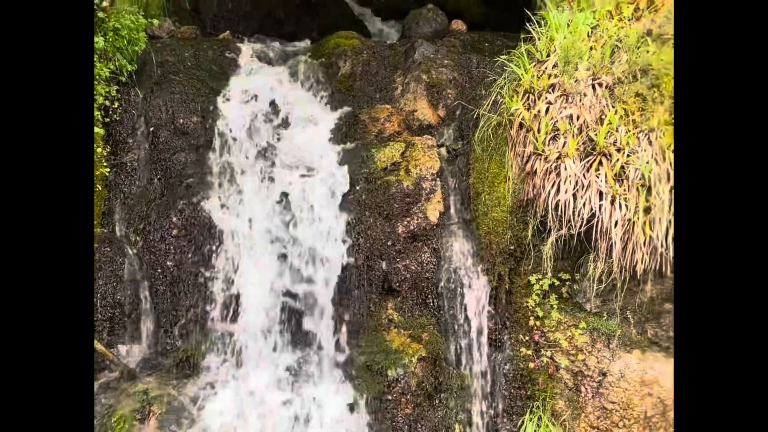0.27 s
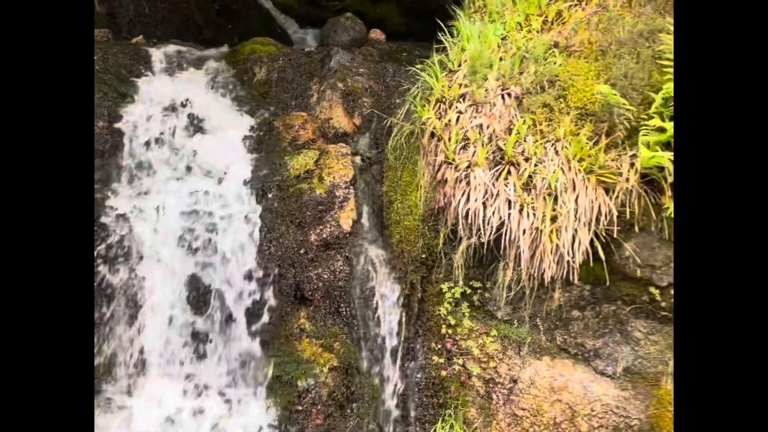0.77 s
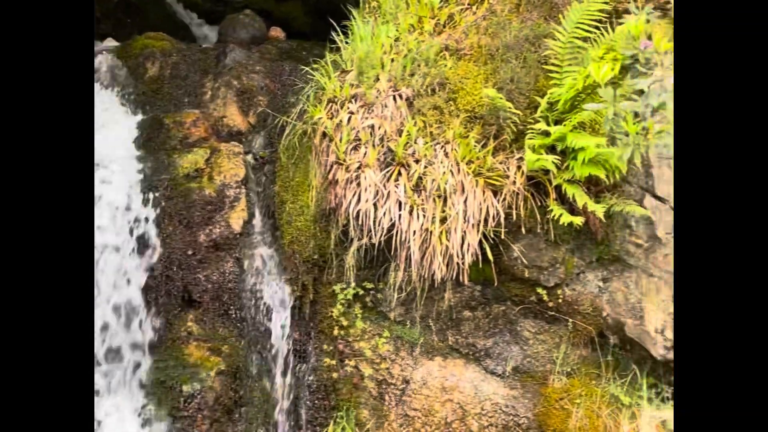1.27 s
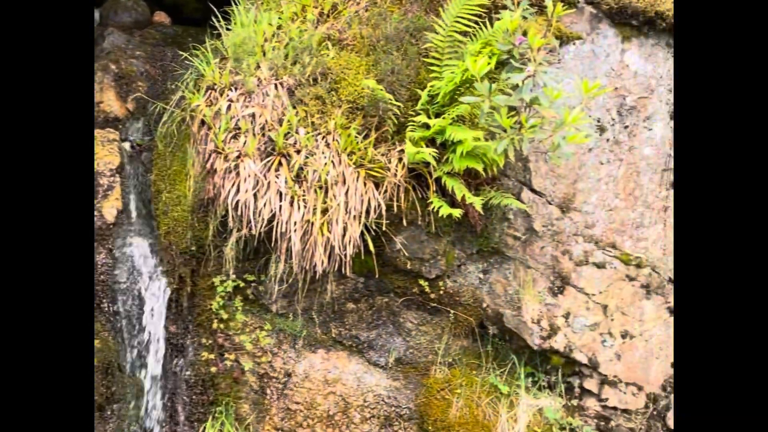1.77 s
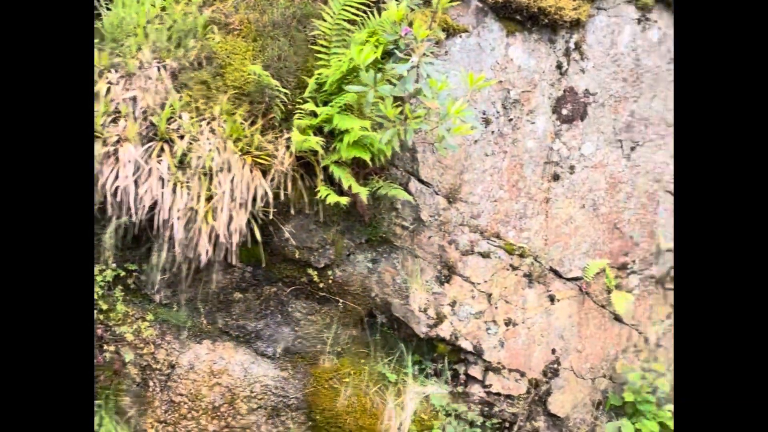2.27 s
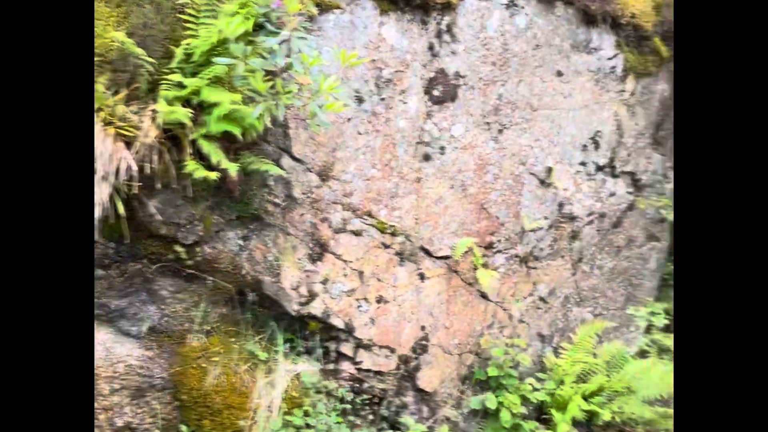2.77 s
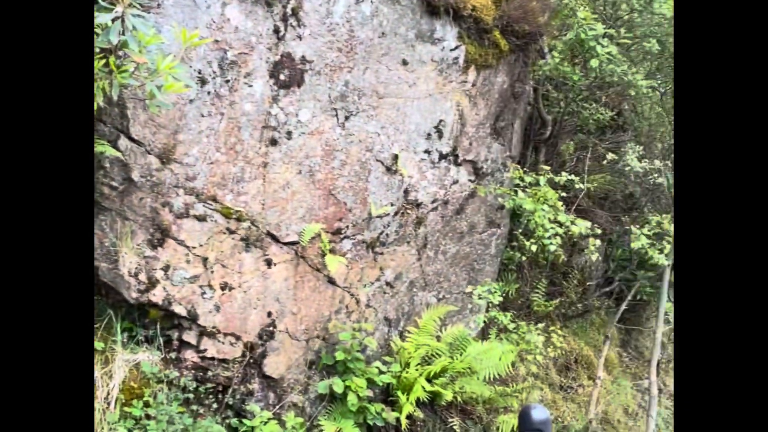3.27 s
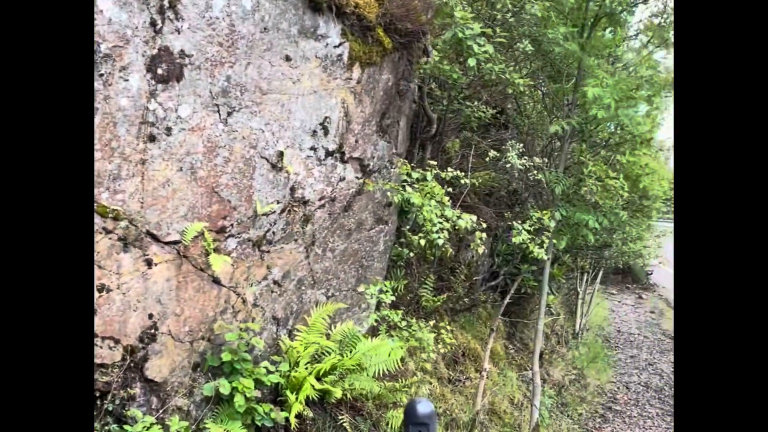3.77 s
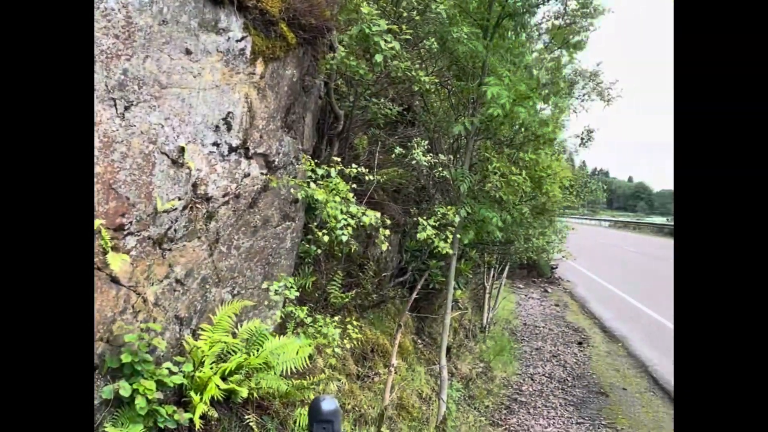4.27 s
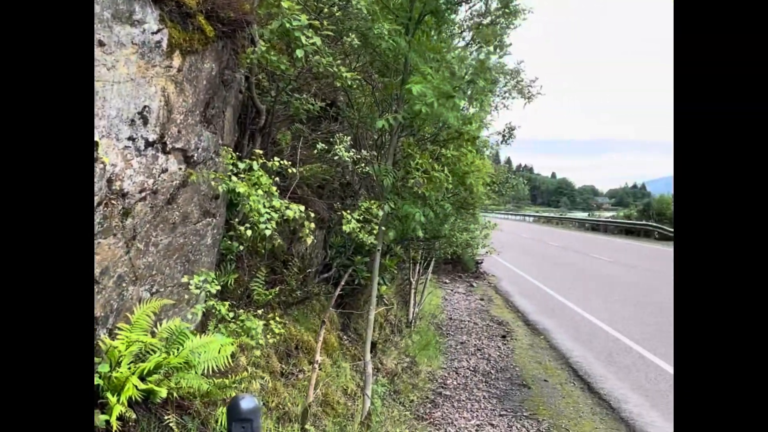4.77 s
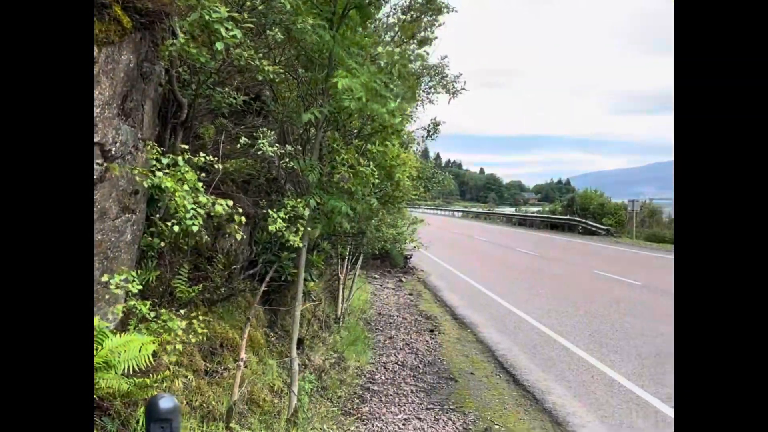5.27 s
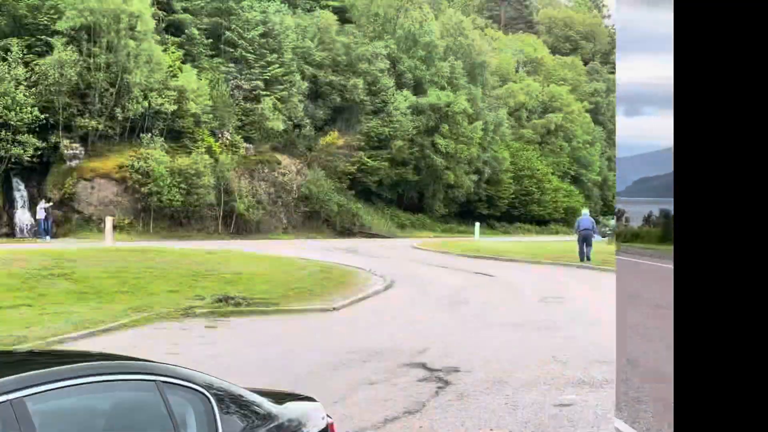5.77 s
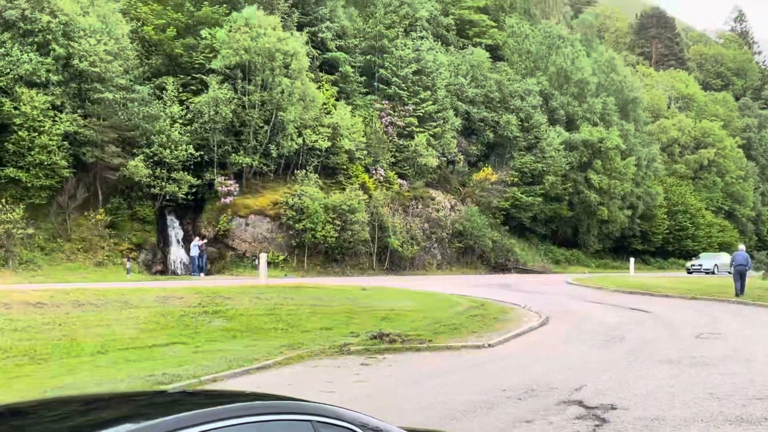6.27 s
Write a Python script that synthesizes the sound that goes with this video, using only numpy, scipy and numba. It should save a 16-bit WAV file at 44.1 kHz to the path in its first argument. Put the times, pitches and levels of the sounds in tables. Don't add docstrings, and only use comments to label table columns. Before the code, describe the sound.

From 0 to about 2 seconds a small waterfall beats on rock very close to a handheld phone: a dense, steady, broadband roar with crisp spray, gurgling body and brief bubble blips, surging slightly as heavier slugs of water land. Wind is barely present. Between 2 and 4 seconds the phone turns away, the water's tone shifts subtly, and low fluttering wind and dull thumps begin on the microphones, with a gust near 3.6. The water stays loud while gusts grow, peaking around 5 to 5.5 with heavy, deep thuds. From 5.4 to 5.9 the close roar crossfades into a distant, smoother, darker wash of water and road. A car's tyres roll past, their hiss brightest around 6.2 and then easing, with lighter wind rumble continuing until the end at roughly 6.5 seconds.

```python
import sys
import numpy as np
from scipy import signal
from scipy.fft import rfft, irfft, next_fast_len
from scipy.io import wavfile
from scipy.ndimage import uniform_filter1d
from numba import njit

SR = 44100
rng = np.random.default_rng(int(sys.argv[2]) if len(sys.argv) > 2 else 0)


def master(y):
    cut = np.clip(np.atleast_2d(y).T, -1, 1)
    pcm = np.round(cut * 32767)
    wavfile.write(sys.argv[1], SR, pcm.astype(np.int16))


def volts_from_db(level):
    exponent = np.asarray(level, float) / 20
    return 10 ** exponent


N = 287957
T = np.arange(N) / SR
HZ = np.fft.rfftfreq(next_fast_len(N), 1 / SR)


def waterfall():
    # (frequency [Hz], level per Hz [dB])
    facing_colour = [(90, -33), (130, -8.5), (250, -4), (500, -2), (900, -2.5), (1500, -4.5), (2600, -8.5),
                     (4300, -11), (5300, -9), (6000, -10.5), (7300, -13), (8300, -7.5), (12300, -9),
                     (15050, -16.5), (15300, -16)]
    turned_colour = [(90, 13), (130, 3), (250, -4.5), (500, -4), (900, -2.5), (1500, -6), (2600, -7.5),
                     (4300, -8), (5300, -8.5), (6000, -12), (7300, -12.5), (8300, -9), (12300, -11.5),
                     (15050, -17.3), (15300, -16)]
    # (frequency [Hz], left minus right [dB], likeness [0-1], left leads [rad])
    facing_pair = [(101, 4, 0.98, 0), (302, -2.5, 0.89, -0.75), (745, -2, 0.44, -0.6),
                   (1020, -2.5, 0.88, -2), (1680, -1.3, 0.38, -1.7), (2250, 0, 0.68, 0.95),
                   (2430, -0.5, 0.24, 1.5), (3280, 1.5, 0.27, 0.8), (3850, -0.5, 0.5, 0.14),
                   (5420, 4, 0.42, 1.1), (5450, -2, 0, 8), (5560, -1, 0.3, -3), (7020, 3, 1, 1.5)]
    turned_pair = [(100, 7, 0.53, -0.5), (302, -5, 0.68, -0.7), (670, -6, 0.57, -1.93),
                   (1260, -2.5, 0.37, -2), (1820, 2, 0.33, -1.4), (2090, -0.5, 0.14, 1.5),
                   (2520, 1, 0.7, 2), (3700, 0, 0.32, -0.2), (4920, 0, 0.92, 1.4), (5070, 4.5, 0.081, 2.5),
                   (5570, -2, 0.22, -4.5), (5900, 4.5, 0.18, -1.5), (6700, 7, 0.36, -2)]
    # (frequency [Hz], left minus right [dB], likeness facing [0-1], likeness turned [0-1], left leads [rad])
    treble_pair = [(7350, 0.8, 0.6, .72, -2), (7560, 2, 0.89, 0.79, -3), (8210, .2, 0.92, 0.92, -3),
                   (8320, .1, 1, 1, -3.14), (8940, 0, 1, 1, -3), (9030, 2.5, 0.94, 0.96, -3),
                   (9540, -2, 0.85, 0.89, -3), (9700, -0.5, 0.65, .65, -3.5), (11700, 0.1, 0.69, 0.72, -5),
                   (12340, -1, 0.84, 0.82, -6.9), (12480, 2, .885, .895, -6), (12950, 0.01, 0.92, .925, -6),
                   (13060, 0.5, 0.96, 1, -6)]
    # (time [s], turned away [0-1])
    phone_swing = [
        (0, 0.02),
        (1, 0.07),
        (2, 0.17),
        (3, 0.64),
        (4, 0.9),
        (5.4, 0.93),
    ]
    # (time [s], length [s], level [dB])
    slugs = [(0.15, 0.041, -8.5), (0.26, 0.027, 1.5), (0.32, 0.026, -7), (0.4, 0.041, 1),
             (0.52, 0.11, -2.5), (0.9, .2, 1), (1.13, 0.068, -5.5), (1.38, .1, 1), (2.42, 0.078, 2),
             (3.46, 0.34, 2), (3.78, 0.18, -1), (4.53, 0.096, -1.5), (4.87, 0.072, 0.5), (5.08, .06, 0),
             (5.34, 0.068, -1.5), (5.62, 0.087, -4), (.73, .08, 0), (1.95, 0.11, -0.5), (3.66, 0.11, -1),
             (4.14, 0.073, -1), (4.39, .1, 1.5), (4.66, 0.081, -4)]
    # (time [s], length [s], level [dB], frequency [Hz])
    strands = [(.32, 0.061, 2, 700), (.85, 0.15, -3.5, 540), (.36, .12, 1.5, 4300), (1.096, 0.13, 1.5, 780),
               (2.07, .12, 2, 1100), (2.3, .08, 0, 2200), (2.8, .12, -3, 150), (3.29, .12, 2, 2200),
               (2.8, 0.053, 0.5, 800), (3.78, .14, 1.5, 388), (3.78, .14, -2.5, 780),
               (4.26, .14, -1.5, 550), (4.51, .14, 2, 1100), (4.51, 0.11, 2, 4300),
               (5.55, .08, -2.5, 12000), (5.72, 0.054, 4, 3500), (5.642, .05, 3, 1200)]
    roar_db, body_share, spray_share = -16.5, 0.24, 0.017
    plunge_wander_db, body_wander_db = 1.5, 0.4

    streams = np.array([spray(fizz_db=-4, gurgle_db=-11.0) for _ in range(3)])
    direct, *scattered = churn(streams, surge_db=0.95, patch_db=0.25, flicker_db=0.49)
    scattered = np.array(scattered)
    facing_pair = facing_pair + [(hz, db, like, lead) for hz, db, like, _, lead in treble_pair]
    turned_pair = turned_pair + [(hz, db, like, lead) for hz, db, _, like, lead in treble_pair]
    facing = ports(direct, scattered, facing_colour, facing_pair, cut_hz=143, notch=1.2)
    turned = ports(direct, scattered, turned_colour, turned_pair, cut_hz=188, notch=0.48)
    away = np.clip(over_time(phone_swing)[0], 0, 1)
    roar = (1 - away) * facing + away * turned

    slug_db = swells(slugs)
    wander = walk(8, count=2)
    plunge_gain = volts_from_db(slug_db + plunge_wander_db * wander[0])
    body_gain = volts_from_db(body_share * slug_db + body_wander_db * wander[1])
    plunge = band(roar, 124, 344, 11.0)
    body = band(roar, 420, 1300, 7.9)
    roar += (plunge_gain - 1) * plunge + (body_gain - 1) * body

    spectrum = to_hz(roar)
    for s, length, db, hz in strands:
        strand = to_wave(spectrum * np.exp(-(np.log2((HZ + 1) / hz) / 0.31) ** 2))
        roar += (volts_from_db(swells([(s, length, db)])) - 1) * strand
    return volts_from_db(roar_db + spray_share * slug_db) * roar


def spray(fizz_db, gurgle_db):
    out = rng.standard_normal(N)
    fizz = (fizz_db, 13000, 5.0, 30000)
    gurgle = (gurgle_db, 4500, 20.1, 1200)
    for db, top_hz, cycles, count in (fizz, gurgle):
        when, pitch, big = rng.random((count, 3)).T
        hz = 150 + top_hz * pitch
        size = np.sqrt(hz) * volts_from_db(5.5 * big)
        start = (when * N).astype(np.int64)
        out += volts_from_db(db) * unit(ring(start, hz, size, cycles, 0.249))
    return unit(out)


@njit
def ring(start, hz, size, cycles, glide):
    out = np.zeros(N)
    for k in range(len(hz)):
        steps = int(4 * cycles * SR / hz[k])
        z = size[k] + 0j
        p = np.exp((2j * np.pi - 1 / cycles) * hz[k] / SR)
        rise = np.exp(2j * np.pi * hz[k] / SR * glide / steps)
        for i in range(start[k], min(start[k] + steps, N)):
            z *= p
            p *= rise
            out[i] += z.imag
    return out


def churn(streams, surge_db, patch_db, flicker_db):
    hz, _, cells = signal.stft(streams, SR, nperseg=256)
    surge = walk(9, count=1, step=128)
    patches = walk(10, count=5, step=128)
    flicker = walk(20, count=9, step=128)
    k = np.arange(9)
    patch = (patches[k // 2] + patches[(k + 1) // 2]) / 2
    swell_db = surge_db * surge + patch_db * patch + flicker_db * flicker
    octave = np.clip(np.log2((hz + 1) / 90), 0, 8)
    share = np.clip(1 - abs(octave[:, None] - k), 0, 1)
    gain = volts_from_db(share @ swell_db)[:, :cells.shape[-1]]
    return signal.istft(cells * gain, SR)[1][:, :N]


def bubbles():
    # (time [s], frequency [Hz], peak level [dB])
    big_bubbles = [(0.099, 1250, -35), (0.325, 770, -31), (0.499, 3703, -37), (0.525, 3122, -36),
                   (0.528, 534, -32), (0.54, 3480, -39), (0.646, 1330, -33), (0.781, 473, -32),
                   (0.83, 256, -35), (0.853, 2024, -37), (0.946, 301, -33), (1.013, 796, -34),
                   (1.022, 426, -31), (1.106, 328, -33), (1.167, 1275, -34), (1.303, 3600, -36),
                   (1.384, 320, -38), (1.495, 296, -34), (1.608, 322, -36), (1.672, 775, -30.5),
                   (1.701, 1350, -34), (1.773, 4048, -40), (1.779, 258, -41), (1.802, 2140, -41),
                   (2.09, 4970, -37), (2.104, 580, -32), (2.29, 3488, -39), (2.31, 2070, -32),
                   (2.377, 3610, -35), (2.461, 2800, -35), (2.514, 2730, -34), (2.577, 2900, -42),
                   (2.583, 2300, -36), (2.757, 3660, -38), (2.804, 303, -33), (2.804, 790, -30),
                   (2.844, 322, -44), (2.862, 3460, -35), (3.007, 480, -34), (3.132, 3596, -36),
                   (3.489, 420, -34.5), (3.564, 1701, -34), (3.567, 3080, -41), (3.733, 4930, -36),
                   (3.95, 1000, -32), (4.136, 383, -34.5), (4.322, 301, -34), (4.362, 301, -41),
                   (4.444, 602, -33), (4.554, 3600, -34.5), (4.85, 1020, -30), (5.085, 2820, -39),
                   (5.338, 990, -36), (5.475, 830, -36), (5.6, 474, -34), (5.751, 861, -38),
                   (5.79, 600, -40), (6.261, 256, -46), (6.284, 1076, -38), (6.339, 1830, -38),
                   (6.345, 1200, -37), (6.409, 1050, -36), (6.441, 254, -39)]
    length_s, level_db, pan_db, glide = 0.011, 0.5, 3, 0.01
    out = np.zeros((2, N))
    places = rng.uniform(-1.3, 1, len(big_bubbles))
    for (s, hz, db), place in zip(big_bubbles, places):
        near = slice(max(int((s - 4 * length_s) * SR), 0), int((s + 4 * length_s) * SR))
        t = T[near] - s
        phase = 2 * np.pi * hz * t * (1 + glide * t / length_s / 2)
        tone = np.exp(-(t / length_s) ** 2) * np.sin(phase)
        out[:, near] += volts_from_db(db + level_db + np.array([[1], [-1]]) * place * pan_db) * tone
    return out


def wind():
    # (time [s], strength [dB])
    strength = [(0.0, -74), (0.08, -81), (0.76, -74), (1.13, -86), (1.9, -75), (2.1, -67), (2.55, -52.5),
                (3.3, -49.5), (3.6, -44), (3.8, -51), (4.4, -52.5), (4.85, -47), (5.0, -41.5), (5.3, -42),
                (5.6, -46), (6.02, -50), (6.1, -57), (6.53, -45)]
    # (low edge [Hz], high edge [Hz], likeness [0-1],
    # level in calm [dB], in breeze [dB], in gust [dB])
    eddy_sizes = [
        (30, 43, 0.6, -95, -74, -45),
        (58, 100, 0.57, -84, -52, -38.5),
        (110.3, 166, 0.49, -61.5, -42.5, -40.5),
    ]
    # (time [s], length [s], level [dB])
    puffs = [(0.45, 0.092, 5.5), (0.95, .1, 4), (1.13, 0.094, -16), (1.6, 0.045, 17), (1.83, .04, 1),
             (.78, 0.055, 12), (2.95, .08, -1), (5.13, .04, -1), (5.42, .05, 1), (6.33, .05, -3),
             (2.05, .06, 6), (2.49, 0.069, 3), (3.07, 0.046, 2), (3.3, 0.034, 1), (3.53, 0.055, -4),
             (3.65, .06, -5), (4.58, 0.041, 3), (4.75, 0.02, 7), (4.8, 0.048, -6), (4.87, 0.035, 1),
             (5.09, 0.033, 1), (5.31, 0.054, -2), (5.84, 0.031, -1), (6.0, 0.038, -5)]
    calm_breeze_gust_db = (-81, -51.5, -40)
    bursts = volts_from_db(swells(puffs) + 2.6 * walk(16, count=1))
    veer_db = np.interp(T, (3.25, 6.3), (0, -9))
    strength_db = over_time(strength)[0]
    out = 0
    for lo_hz, hi_hz, like, *levels_db in eddy_sizes:
        both, left, right = band(rng.standard_normal((3, N)), lo_hz, hi_hz, 24)
        like = np.clip(like, 0, 1)
        eddy = np.sqrt(like) * both + np.sqrt(1 - like) * np.array([left, right])
        eddy_db = np.interp(strength_db, calm_breeze_gust_db, levels_db) + veer_db * np.log2(lo_hz / 50)
        out = out + volts_from_db(eddy_db) * unit(eddy) * bursts
    return out


def thumps():
    # (time [s], peak level [dB], frequency [Hz], length [cycles], left minus right [dB])
    shoves = [(2.337, -35, 120, 3, -3), (2.468, -31, 150, 2.5, 7), (2.656, -34, 125, 2.5, -5),
              (2.741, -29, 140, 1.4, 0), (2.844, -28, 330, 1.6, 14), (3.072, -35, 120, 1.6, 2),
              (3.416, -31, 65, 1.2, -1), (3.529, -33, 127, 3.5, -2), (3.583, -34, 105, 2, 2),
              (3.612, -31, 120, 3, 0.1), (3.643, -31, 125, 2.5, 0.1), (3.685, -33, 58, 1.7, -1),
              (4.205, -35, 150, 2.7, 0), (4.399, -32, 120, 2.1, 0), (4.89, -36, 110, 2.5, 3),
              (4.951, -32, 77, 1.3, -4), (4.977, -29, 72, 1.5, -4), (5.029, -30, 85, 2.5, 0),
              (5.197, -37, 95, 2.5, 0), (5.25, -22, 80, 1, 0.1), (5.501, -26, 85, 0.92, 2),
              (5.513, -24, 80, 1, 3), (5.45, -38, 70, 1.5, 0), (5.485, -34, 110, 1.3, -2),
              (5.565, -38, 70, 1.5, 0), (5.655, -35, 55, 1.2, 0), (5.688, -32, 110.4, 1.6, 4),
              (5.735, -39, 80, 1.5, 1), (5.775, -40, 60, 1.3, 2), (5.805, -42, 130, 1.5, 0),
              (5.88, -30.5, 65, 1.2, -2), (5.91, -39, 151, 1.8, 0), (5.975, -37, 85, 1.5, 2),
              (6.017, -38, 90, 1.6, 2), (6.086, -40, 180, 2, 0), (6.0, -42, 45, 1, 0),
              (6.12, -47, 60, 1.2, 0), (6.26, -41, 70, 1.2, 0), (6.51, -40, 60, 1.5, 0)]
    out = np.zeros((2, N))
    for s, db, hz, cycles, pan_db in shoves:
        turn = (T - s) * hz
        swing = np.cos(2 * np.pi * turn) - np.exp(-(np.pi * cycles / 2) ** 2)
        shove = np.exp(-(2 * turn / cycles) ** 2) * swing
        out += volts_from_db(db + np.array([[pan_db], [-pan_db]]) / 2) * shove
    return out


def far_road():
    # (frequency [Hz], level per Hz [dB])
    far_colour = [(60, -11), (240, -8.5), (330, -13.5), (520, -9), (700, -8), (1050, -8), (1500, -8),
                  (2200, -18), (3500, -24.5), (5000, -28), (7500, -28.5), (9000, -33), (11000, -35.5),
                  (13800, -41), (14600, -48), (15000, -62), (15300, -80)]
    # (frequency [Hz], left minus right [dB], likeness [0-1], left leads [rad])
    far_pair = [(100, -0.4, 0.91, 2.5), (310, 0.3, 0.98, -1), (600, -1.4, 0.99, 0.7),
                (1200, 0.48, 0.94, 0.5), (1770, -0.2, 0.93, 0.1), (3000, 0.3, 0.95, 0.5),
                (4500, -0.3, 1, 1), (5300, -0.1, 0.71, -0.3), (5940, 0.1, 0.82, -1), (6700, -0.1, 0.63, -1),
                (7800, 0.3, 1, -2), (9300, 0.0, 1, -3.5), (11300, -0.0, 0.48, -4), (12200, 0, .8, -6.5),
                (12400, 0, 1, -6.28)]
    # (time [s], length [s], level [dB])
    hum_lull = [
        (5.8, .1, -2.5),
        (5.87, .04, -6),
        (5.98, 0.05, -6),
        (6.07, .05, -1),
        (6.2, .05, -4),
        (6.3, 0.05, -0.5),
        (6.39, .04, -3),
        (6.45, .05, 2.5),
    ]
    nearest_s, span_s, leaving_slower = 6.19, 0.31, 1.34
    level_db, hum_db = -17, 1.5
    span = np.where(T < nearest_s, span_s, span_s * leaving_slower)
    near = np.exp(-((T - nearest_s) / span) ** 2)
    roar_db = 2.5 + (-1.25 - 2.5) * near
    hiss_db = -7 + (5.5 + 7) * near
    peak_hz = 805 + (1080 - 805) * near

    noise = rng.standard_normal((3, N))
    tyres = noise[0]
    bounce = np.interp(np.arange(N) - SR / peak_hz, np.arange(N), tyres)
    rolling = tyres + 0.33 * band(bounce, 520, 1200, 5.3)
    rolling += (volts_from_db(hum_db + swells(hum_lull)) - 1) * band(tyres, 300, 640, 13)
    rolling += (volts_from_db(hiss_db) - 1) * band(tyres, 1520, 3300, 18)
    rolling = volts_from_db(roar_db + 0.68 * walk(7.9, count=1)[0]) * rolling
    return volts_from_db(level_db) * ports(rolling, noise[1:], far_colour, far_pair, cut_hz=110, notch=0.5)


def ports(direct, scattered, colour, pair, cut_hz, notch):
    pan_db, like, lead = over_hz(pair)
    like = np.clip(like, 0, 1)
    trim = volts_from_db(over_hz(colour)[0]) / np.sqrt(1 + (cut_hz / (HZ + 1)) ** 12)
    trim = trim * volts_from_db(notch * -3.5 / (1 + ((HZ - 5550) / 120) ** 4))
    side = np.array([[1], [-1]])
    shifted = to_hz(direct) * np.exp(.5j * side * lead)
    heard = np.sqrt(like) * shifted + np.sqrt(1 - like) * to_hz(scattered)
    return to_wave(heard * trim * volts_from_db(side * pan_db / 2))


def unit(x):
    return x / np.sqrt(np.mean(x ** 2))


def to_hz(x):
    return rfft(x, next_fast_len(N))


def to_wave(spectrum):
    return irfft(spectrum, next_fast_len(N))[..., :N]


def over_time(table):
    s, *columns = np.transpose(table)
    return [np.interp(T, s, c) for c in columns]


def over_hz(table):
    hz, *columns = np.transpose(table)
    return [np.interp(np.log(HZ + 1), np.log(hz), c) for c in columns]


def swells(table):
    return sum(db * np.exp(-((T - s) / length) ** 2) for s, length, db in table)


def walk(rate, count, step=1):
    k = int(SR / rate / step)
    held = np.repeat(rng.standard_normal((count, N // step // k + 2)), k, axis=1)
    slewed = uniform_filter1d(uniform_filter1d(held, k), k)
    steady = slewed - uniform_filter1d(slewed, 4 * k)
    return 1.22 * steady[:, :N // step + (step > 1) * 2]


def band(x, lo_hz, hi_hz, steep):
    skirts = (1 + (lo_hz / (HZ + 1)) ** steep) * (1 + (HZ / hi_hz) ** steep)
    return to_wave(to_hz(x) / np.sqrt(skirts))


def thin(x):
    # (frequency [Hz], mid [dB], side [dB])
    weakest = [(600, -90, -90), (2000, -25, -30), (4500, -9, -11), (7000, -6, -9), (7500, -4, -12),
               (7650, -20, -14), (9550, -20, -14), (9700, -4, -12), (10500, -7, -9), (12000, -10, -8),
               (13500, -6, -8), (14500, 0, -8), (15100, 1, -8), (15300, -1, -8)]

    def around(p):
        return uniform_filter1d(uniform_filter1d(p, size=48, axis=1), size=7, axis=2) + 1e-18

    hz, _, cells = signal.stft([x[0] + x[1], x[0] - x[1]], SR, window="cosine", nperseg=2048)
    power = abs(cells) ** 2
    at_hz, *limits_db = np.transpose(weakest)
    limit = volts_from_db(np.array([np.interp(hz, at_hz, db) for db in limits_db]))[..., None] ** 2
    kept = power > limit * around(power)
    makeup = np.sqrt(around(power) / around(power * kept))
    mid, side = signal.istft(cells * kept * makeup, SR, window="cosine")[1][:, :N]
    return np.array([mid + side, mid - side]) / 2


def scene():
    fade = np.clip((T - 5.41) / (5.87 - 5.41), 0, 1)
    return (1 - fade) * waterfall() + fade * far_road() + wind() + thumps() + bubbles()


def top_cut(x):
    return signal.sosfilt(signal.butter(12, 15730, fs=SR, output="sos"), x)


def record(dry):
    mix = band(thin(dry), 10, 15730, 400)
    return top_cut(mix)


dry = scene()
out = record(dry)
master(out)
```